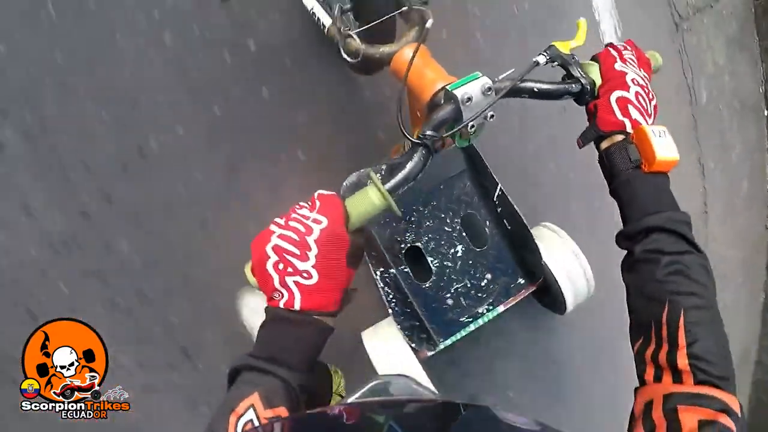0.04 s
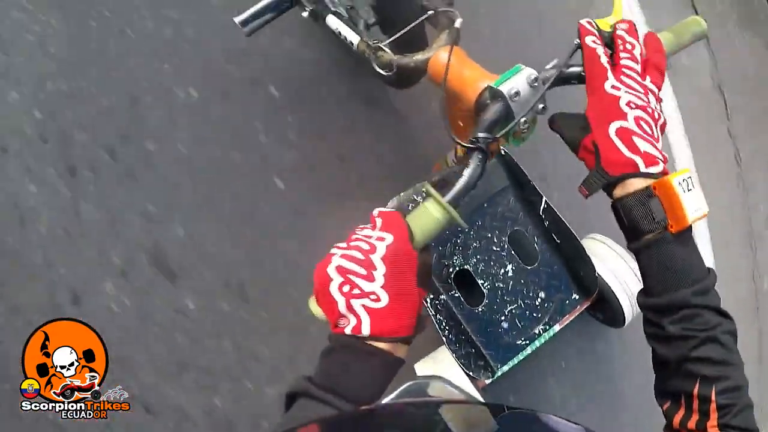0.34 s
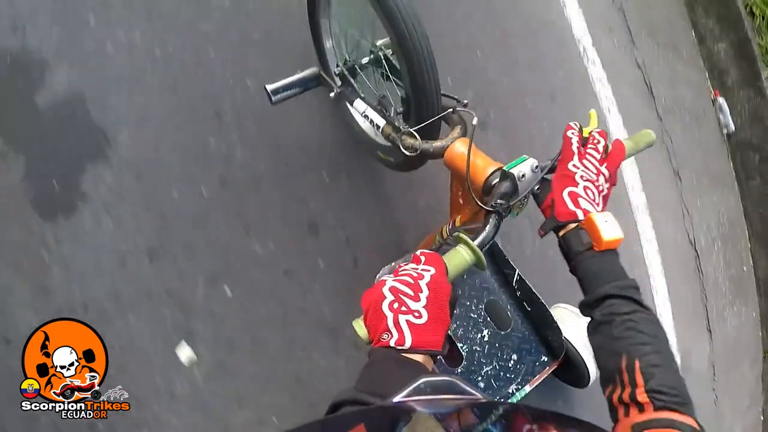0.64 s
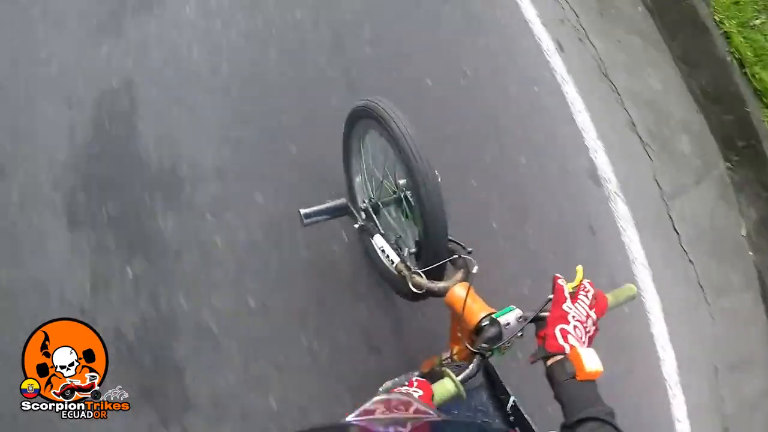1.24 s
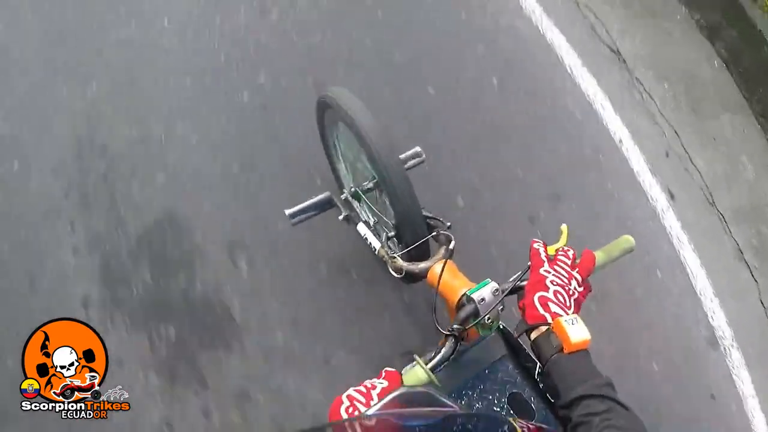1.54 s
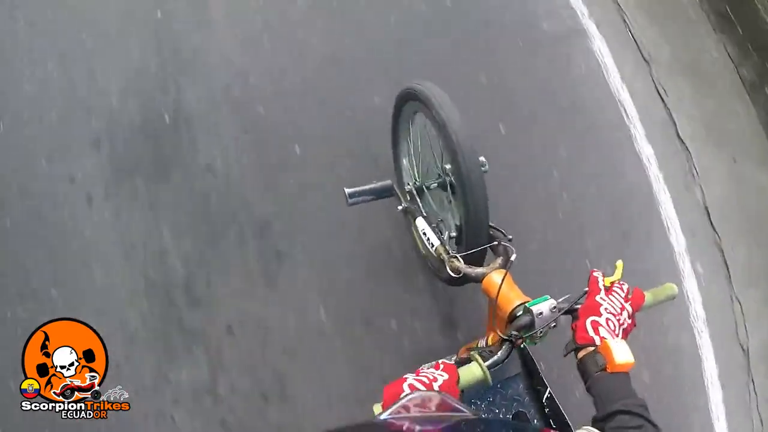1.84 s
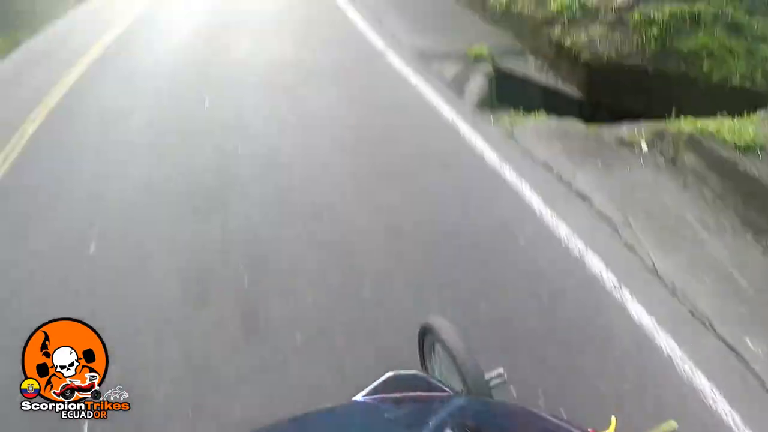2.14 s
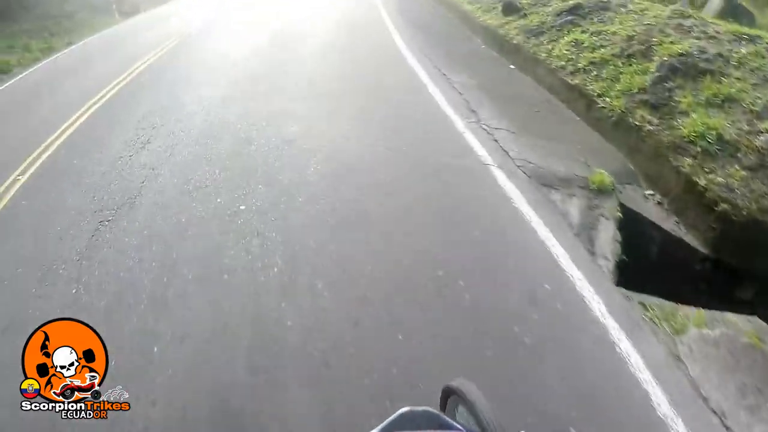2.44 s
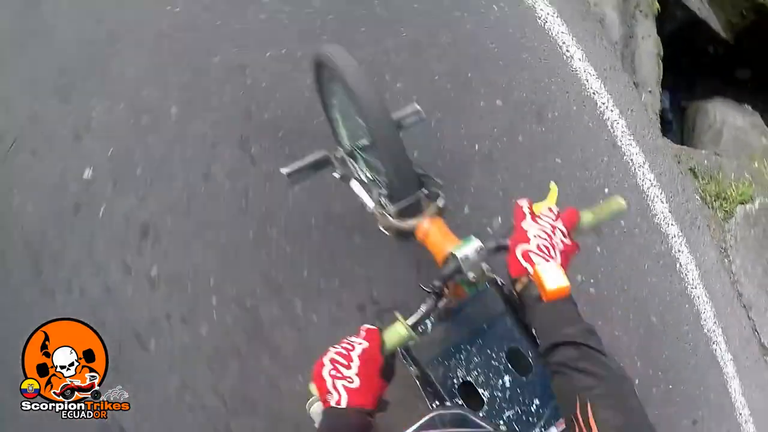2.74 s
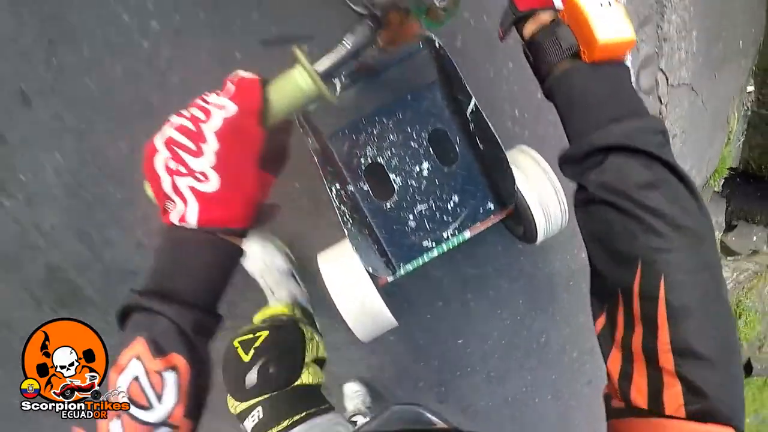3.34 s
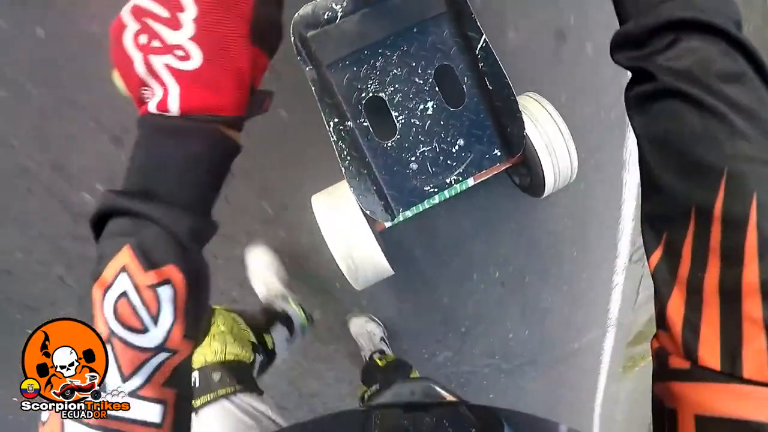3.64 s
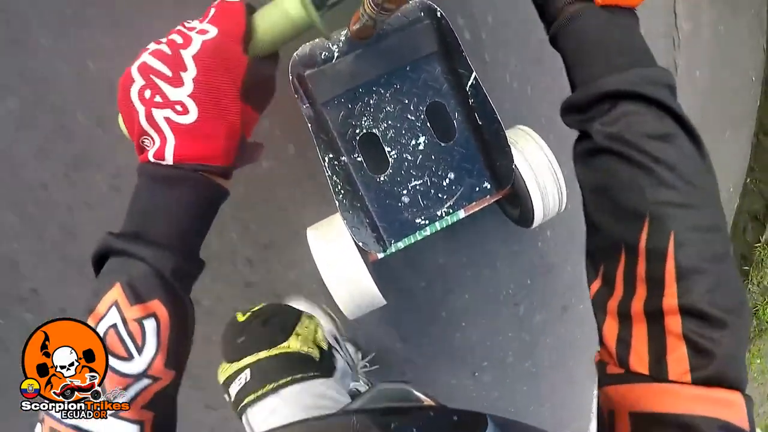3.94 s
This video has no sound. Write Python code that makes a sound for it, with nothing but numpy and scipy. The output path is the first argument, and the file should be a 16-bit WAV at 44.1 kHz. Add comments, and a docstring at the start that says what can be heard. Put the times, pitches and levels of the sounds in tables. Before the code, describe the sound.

A drift trike rolls down a paved road, heard close from the rider's helmet. Its wheels drone and hiss while the chassis ticks and knocks over low wind. A gust hits from the left, then the rolling noise returns.

```python
"""Low wind rumbles over the roar and hiss of hard plastic wheels rolling on gritty asphalt.
A drift trike runs downhill, heard close up from the stereo microphone on the rider's helmet camera.
The trike ticks, bumps knock the frame, air thuds round the helmet and a loose part rattles.
From about 1 s to 3 s the sound widens from mono to stereo and wind buffets the left side;
then it narrows and the wheels come forward again."""
import sys
import numpy as np
from scipy import signal
from scipy.fft import rfft, irfft
from scipy.io import wavfile

SR = 44100
rng = np.random.default_rng(int(sys.argv[2]) if len(sys.argv) > 2 else 0)


def master_out(mix):
    """Clip the mix to full scale and print it as 16-bit PCM to the path in sys.argv[1]."""
    frames = np.transpose(np.atleast_2d(mix))
    ceiling = np.clip(frames, -1, 1)
    pcm = np.round(ceiling * 32767).astype(np.int16)
    wavfile.write(sys.argv[1], SR, pcm)


N = 176400
T, HZ = np.arange(N) / SR, np.fft.rfftfreq(N, 1 / SR)

# Levels are relative: spectra give shape only, and the functions add their own gains.
# low wind in both channels (t/s, level/dB)
RUMBLE_LEVEL = [(0.0, -18.5), (0.13, -28), (0.36, -24.5), (0.47, -32), (0.62, -17.5), (1.09, -27.5),
                (1.34, -23.5), (1.53, -31), (1.62, -24), (1.75, -36), (1.96, -21), (2.28, -26.5),
                (2.34, -40), (2.59, -33), (2.84, -52), (2.99, -29.5), (3.06, -34), (3.28, -31),
                (3.35, -36.5), (3.46, -26.5), (3.72, -25.5), (3.99, -36)]
# hollow drone of wheels and frame (t/s, level/dB)
DRONE_LEVEL = [(0, -37.5), (.12, -27.5), (.5, -30.5), (.66, -29), (1.0, -28), (1.4, -29), (2.4, -40.5),
               (2.8, -49), (2.93, -40), (2.98, -34.5), (3.35, -34), (3.6, -25), (3.7, -30), (3.8, -32.5),
               (4, -32)]
# wheels on the road (t/s, roar/dB, hiss/dB)
ROLL_LEVELS = [(0, -33.5, -44), (.7, -33.5, -44), (1.2, -34, -47), (1.75, -36, -49), (2.15, -37.5, -57.5),
               (2.5, -49, -59), (2.52, -52, -65), (2.75, -46, -60.5), (3.0, -42.5, -51), (3.3, -39, -47.5),
               (3.55, -34.5, -42.5), (3.7, -34.5, -42), (3.78, -37.5, -43.5), (3.95, -32, -40),
               (4, -41, -51)]
# narrow ring within the hiss (t/s, f/Hz, level/dB)
HISS_RING = [(0, 3820, -12), (1.0, 3800, -12), (1.3, 3830, -6.5), (2.0, 3510, 5), (2.2, 3600, -6),
             (2.57, 4350, -16), (2.64, 4300, 0.5), (2.9, 4400, -6), (3.3, 4230, -14), (3.7, 4330, -6)]
# spectra of the low wind and the rolling wheels (f/Hz, level/dB)
RUMBLE_SPECTRUM = [(8, -5), (28, 2), (50, -12), (88, -4), (130, -14), (200, -23.5), (500, -54)]
DRONE_SPECTRUM = [(60, 7), (140, -1.5), (230, 3.5), (400, 2.5), (550, -4), (800, -13), (1500, -54)]
ROAR_SPECTRUM = [(300, -2), (600, -1), (950, -1.5), (1250, -1.5), (1550, -5), (1800, -6.5), (2100, -5),
                 (2400, -6.5), (2650, -13.5), (3200, -17), (5000, -61)]
HISS_SPECTRUM = [(2000, -17), (2600, -43), (3100, -8), (3450, -3.5), (3800, 0.5), (4150, 1.5), (4650, 1),
                 (5350, -5.5), (5850, -5.5), (7000, -13), (8500, -17.5), (10000, -26), (11500, -32),
                 (12500, -27.5), (14500, -39), (15500, -56)]

# sharp ticks of the trike (t/s, level/dB, ring f/Hz, body/dB, top/dB)
TICK_HITS = [(0.0409, -28.5, 4230, -22, -25), (0.081, -24, 5510, -11, -12), (0.1072, -22, 4680, -16, -15),
             (0.1512, -17, 3690, -20, -26), (0.261, -25, 4700, -3.5, -19), (0.372, -28.5, 4000, -9, -14),
             (0.4247, -24, 3670, -15, -24), (0.5043, -28, 3870, 1.5, -13), (0.6218, -20.5, 3840, -8, -12),
             (0.727, -29.5, 3740, -2.5, -19), (0.849, -24.5, 3600, -12, -15), (1.0235, -25, 5540, -7, -21),
             (1.078, -18, 4160, -8, -34), (1.2327, -22.5, 4030, -10, -24), (1.3305, -26, 3850, -0.5, -37),
             (1.4408, -13, 3673, -9, -26), (1.6475, -23.5, 5130, -1, -25), (1.664, -16, 3490, -18, -24),
             (1.881, -18, 3780, -11, -19), (1.9643, -22, 3750, -13, -15), (2.1797, -24, 5980, -13, -5.5),
             (3.158, -30, 4200, -7.5, -32), (3.3497, -18.5, 5790, -10.5, -8),
             (3.5605, -22, 6220, -8.5, -9.5), (3.604, -37, 4600, -23, -5), (3.847, -27, 4500, -19, -14)]
# a tick's crack, body and top (f/Hz, level/dB)
CRACK_SPECTRUM = [(2500, -32), (3100, -8.5), (3700, 7), (4600, 2.5), (5200, 5), (5900, 1), (7400, -8),
                  (9000, -24), (11000, -25)]
BODY_SPECTRUM = [(300, -1), (900, -12.5), (1800, -1.5), (2350, 0), (2800, -17)]
TOP_SPECTRUM = [(3000, -44), (6500, 3), (8200, 1), (9500, -7), (11000, -20), (12700, -7), (14500, -21)]
# frame knocks and wheel scuffs (t/s, level/dB, ring f/Hz, decay/s)
KNOCK_HITS = [(.35, -20.5, 558, 0.02), (.474, -19, 520, 0.016), (.486, -18.5, 890, .009),
              (.625, -14.5, 700, 0.0089), (1.078, -20, 500, 0.0094), (1.281, -11.5, 670, 0.011),
              (1.414, -16, 580, 0.0078), (1.527, -17.5, 615, 0.0061), (3.028, -25, 712, 0.012),
              (3.3, -19, 573, 0.014), (3.589, -33, 440, .014), (3.682, -20.5, 780, 0.028),
              (3.715, -20.5, 612, 0.03), (3.805, -19.5, 493, 0.022), (3.877, -13, 520, 0.0046),
              (3.933, -14.5, 943, 0.0095), (3.957, -19, 823, 0.015)]
# air thudding round the helmet (t/s, length/s, level/dB)
THUD_SWELLS = [(.585, .025, -32), (3.586, 0.027, -21), (3.675, 0.058, -20.5)]
# spectra of knocks and thuds (f/Hz, level/dB)
KNOCK_SPECTRUM = [(150, -36), (400, -9), (650, 5.5), (950, 5.5), (1400, -8), (2200, -8.5), (3000, -20),
                  (6000, -56)]
THUD_SPECTRUM = [(40, -20), (90, 10.5), (200, -1.5), (350, -10.5), (600, -4), (1000, -54)]
# bounces of the loose part (t/s, level/dB)
RATTLE_BOUNCES = [(.657, -24.5), (0.684, -30), (0.697, -31.5), (.705, -39), (0.734, -32), (0.753, -33)]
# its resonances (f/Hz, level/dB, t60/s)
RATTLE_MODES = [(2230, -2.5, 0.035), (2480, -6, 0.022), (2880, -8.5, .02), (3700, -5.5, 0.021)]

# how far the sound opens from mono to stereo; also fades the gust in and out (t/s, share/0-1)
STEREO_SHARE = [(.83, 0), (1.0, 0.99), (2.85, 1), (3.05, 0.51), (3.3, 0.17), (4, 0.04)]
# wind on the left microphone port (t/s, thump/dB, buffet/dB, rush/dB)
GUST_LEVELS = [(1.0, -32, -39, -38.5), (1.06, -29.5, -30.5, -29.5), (1.4, -25, -27, -26),
               (1.72, -19, -25, -20.5), (1.8, -20.5, -23.5, -32), (1.92, -22, -26, -20.5),
               (2.05, -17, -24, -25), (2.11, -24, -29, -25), (2.17, -25, -20.5, -24),
               (2.28, -17.5, -17, -26.5), (2.44, -17.5, -18, -25), (2.54, -23, -17, -30.5),
               (2.7, -25.5, -27, -38.5), (2.78, -37, -45, -41), (2.87, -55, -47, -34.5),
               (2.97, -43, -42, -42)]
# hard eddies slapping it (t/s, length/s, slap/dB, buffet/dB)
EDDY_SLAPS = [(1.56, 0.028, -32, -10), (2.164, 0.031, -17, -30), (2.232, 0.057, -28, -18),
              (2.291, .035, -27, -14), (2.408, 0.012, -32, -14.5), (2.475, 0.034, -15.5, -17),
              (2.5, 0.027, -23, -7), (2.558, 0.028, -26, -14)]
# air fizzing across both ports (t/s, level/dB)
FIZZ_LEVEL = [(1.0, -53.5), (1.7, -52), (2.16, -47), (2.19, -43.5), (2.26, -51), (2.38, -55.5),
              (2.5, -60.5), (2.52, -67), (2.9, -59)]
# spectra of the wind on the microphone (f/Hz, level/dB)
THUMP_SPECTRUM = [(10, -15), (28, -2.5), (60, 0), (105, -0.5), (160, -21.5), (400, -67)]
BUFFET_SPECTRUM = [(50, -13), (110, 4.5), (200, 2.5), (320, -2.5), (480, -8.5), (900, -37)]
RUSH_SPECTRUM = [(150, -14), (350, 2), (520, -3.5), (660, -1.5), (780, -9.5), (950, -8), (1400, -22.5),
                 (2100, -27.5), (3000, -36), (5000, -42.5), (7000, -50)]
SLAP_SPECTRUM = [(250, -14), (450, -4.5), (700, 10.5), (1000, 3), (1400, -11), (2200, -23.5), (3000, -34),
                 (6000, -42.5)]
FIZZ_SPECTRUM = [(2500, -13), (4500, 3), (7300, -1), (8500, -12), (10000, -15.5), (11500, -31.5)]
# gust in the left channel over the right (f/Hz, level/dB)
LEFT_EXCESS = [(40, 36), (150, 23.5), (300, 15), (500, 8.5), (1000, -1), (1700, -4), (3000, -1.5),
               (8000, -2)]
# the left channel's lead (f/Hz, phase/rad)
LEFT_LEAD = [(100, -3), (400, -2.5), (900, -2.5), (1700, -2.5), (3000, -2.3), (8000, -5)]


def amp(db):
    """Decibels to gain."""
    return 10 ** (np.asarray(db) / 20)


def unit(x):
    """Scales to rms 1."""
    return x / np.sqrt(np.mean(x ** 2) + 1e-20)


def curve(rows):
    """Each column of a time table, sample by sample."""
    times, *columns = np.transpose(rows)
    return [np.interp(T, times, column) for column in columns]


def read(points, hz):
    """Reads a spectrum table on a log-frequency axis."""
    f, value = np.transpose(points)
    return np.interp(np.log(hz + 1), np.log(f), value)


def colour(x, points):
    """Filters by a spectrum table, falling steeply past its last point, to rms 1."""
    hz = np.fft.rfftfreq(len(x), 1 / SR)
    rolloff = np.maximum(hz / points[-1][0], 1) ** 3
    return unit(irfft(rfft(x) * amp(read(points, hz)) / rolloff, len(x)))


def noise(points, length=N):
    """Noise with the given spectrum, rms 1."""
    return colour(rng.standard_normal(length), points)


def wander(rate_hz):
    """Random motion from 2 Hz to about the given rate, rms 1."""
    band = (HZ > 2) / np.sqrt(1 + (HZ / rate_hz) ** 4)
    return unit(irfft(rfft(rng.standard_normal(N)) * band, N))


def flutter(rate_hz, depth_db):
    """Randomly wavering gain, rms 1."""
    return unit(amp(depth_db * wander(rate_hz)))


def swells(rows):
    """Gain made of short rounded swells (t/s, length/s, level/dB)."""
    return sum(amp(db) * np.sin(np.pi * np.clip((T - s) / length, 0, 1)) for s, length, db in rows)


def resonate(x, hz, width_hz):
    """A resonance of gain 1 that follows the curve hz."""
    turn = np.exp(2j * np.pi * np.cumsum(hz) / SR)
    pole = np.exp(-np.pi * width_hz / SR)
    return 2 * (turn * signal.lfilter([1 - pole], [1, -pole], x / turn)).real


def add(mix, s, sound):
    """Mixes a sound in at time s."""
    part = mix[..., max(round(s * SR), 0):][..., :sound.shape[-1]]
    part += sound[..., :part.shape[-1]]


def spread(mid, side, width):
    """A pair of channels that opens from mono to stereo with STEREO_SHARE."""
    opening = width * curve(STEREO_SHARE)[0]
    return np.array([mid + opening * side, mid - opening * side]) / np.sqrt(1 + opening ** 2)


def rumble():
    """Lumpy low wind round the helmet, the same in both channels."""
    return amp(curve(RUMBLE_LEVEL)[0]) * noise(RUMBLE_SPECTRUM) * flutter(rate_hz=103, depth_db=2.5)


def stones(per_s, spread_db=4.5):
    """Stones click under the wheels at random, most small and a few large."""
    hits = rng.random(N) < per_s / SR
    sizes = amp(spread_db * np.minimum(rng.exponential(1, N), 4))
    return hits * sizes * rng.choice([-1, 1], N)


def grit(per_s=800, pitches=12, range_hz=(3590, 6420), ring_s=0.00039):
    """Grains crushed under the wheels, each with its own short ping."""
    t = T[:512]
    envelope = t / ring_s * np.exp(-t / ring_s)
    pings = [envelope * np.sin(2 * np.pi * hz * t) / hz for hz in np.geomspace(*range_hz, pitches)]
    return unit(sum(np.convolve(stones(per_s / pitches), ping)[:N] for ping in pings))


def wheels():
    """Rough asphalt shakes the hollow wheels below the rider: drone, roar, ringing hiss and grit."""
    roar_db, hiss_db = curve(ROLL_LEVELS)
    ring_hz, ring_db = curve(HISS_RING)
    ring_hz *= 1 + 0.028 * wander(rate_hz=53)
    bumps = flutter(rate_hz=46, depth_db=1.66)
    crunch = stones(per_s=600)
    drone = amp(curve(DRONE_LEVEL)[0] + 2) * noise(DRONE_SPECTRUM) * flutter(rate_hz=14, depth_db=1.5)
    roar = unit(noise(ROAR_SPECTRUM) + amp(-6.5) * colour(crunch, ROAR_SPECTRUM))
    roar = amp(roar_db - 3) * spread(roar, noise(ROAR_SPECTRUM), width=0.16)
    roar *= flutter(rate_hz=140, depth_db=1.5)
    ring = rng.standard_normal(N) + unit(crunch)
    for _ in range(2):
        ring = resonate(ring, ring_hz, width_hz=290)
    hiss = amp(-2.6) * noise(HISS_SPECTRUM) + amp(-2.5) * grit()
    hiss += amp(ring_db) * unit(ring) * flutter(rate_hz=40, depth_db=2.5)
    hiss = amp(hiss_db) * spread(hiss, noise(HISS_SPECTRUM), width=0.1)
    return bumps * (drone + roar + hiss)


def ticks(rise_s=0.0022, fall_s=0.0032, tail_s=0.032, ring_s=0.0037, clank_ratio=0.487):
    """Chattering contacts on the trike crack, ring and clank, leaving a faint tail."""
    mid_side, t = np.zeros((2, N)), T[:4096]
    rise = np.minimum(t / rise_s, 1)
    age = np.maximum(t - rise_s, 0)
    fall = np.exp(-age / fall_s) + amp(-16.5) * np.exp(-age / tail_s)
    for s, db, ring_hz, body_db, top_db in TICK_HITS:
        tick = np.zeros((2, len(t)))
        for channel in tick:
            crack = noise(CRACK_SPECTRUM, len(t))
            body = amp(body_db + 8.5) * noise(BODY_SPECTRUM, len(t))
            top = amp(top_db + 3.5) * noise(TOP_SPECTRUM, len(t))
            channel += amp(-10) * fall * (crack + body + top)
        ring_db = -5.5 + 0.75 * (db + 18)  # harder ticks ring more
        ring = amp(ring_db) * np.sin(2 * np.pi * ring_hz * t)
        clank = amp(body_db - 5) * np.sin(2 * np.pi * clank_ratio * ring_hz * t)
        tick[0] += (ring + clank) * np.exp(-age / ring_s)  # the tones sit in the centre
        add(mid_side, s, amp(db) * rise * tick)
    return spread(*mid_side, width=0.53)


def knocks(rise_s=0.0026):
    """Bumps in the road jolt the frame and scuff the wheels."""
    out, t = np.zeros(N), T[:4096]
    for s, db, ring_hz, fall_s in KNOCK_HITS:
        envelope = np.minimum(t / rise_s, 1) * np.exp(-t / fall_s)
        scuff = amp(-9) * noise(KNOCK_SPECTRUM, len(t))
        ring = amp(-10.5) * np.sin(2 * np.pi * ring_hz * t)
        add(out, s, amp(db) * envelope * (scuff + ring))
    return out


def thuds():
    """Short low pushes of air, right on the microphone."""
    return swells(THUD_SWELLS) * noise(THUD_SPECTRUM)


def rattle():
    """After a hard bump a loose part bounces, ringing a little differently each time."""
    out, t = np.zeros(N), T[:2048]
    for s, db in RATTLE_BOUNCES:
        for hz, mode_db, t60 in RATTLE_MODES:
            tone = np.sin(2 * np.pi * hz * rng.uniform(0.97, 1.03) * t)
            add(out, s, amp(db + mode_db - 60 * t / t60) * tone)
    return out


def gust():
    """Eddies hit the left port; the right channel carries a thinner, nearly inverted copy."""
    thump_db, buffet_db, rush_db = curve(GUST_LEVELS)
    eddies = flutter(rate_hz=28, depth_db=3.0)
    thump = amp(thump_db + 5.5) * noise(THUMP_SPECTRUM)
    buffet = amp(buffet_db + 5) * noise(BUFFET_SPECTRUM)
    rush = amp(rush_db + 4.5) * noise(RUSH_SPECTRUM) * eddies
    starts, lengths, slap_db, slap_buffet_db = np.transpose(EDDY_SLAPS)
    slaps = noise(SLAP_SPECTRUM) * swells(zip(starts, lengths, slap_db))
    slaps += noise(BUFFET_SPECTRUM) * swells(zip(starts, lengths, slap_buffet_db))
    left = thump + buffet + rush + slaps
    left_to_right = amp(-read(LEFT_EXCESS, HZ)) * np.exp(-1j * read(LEFT_LEAD, HZ))
    right = irfft(rfft(left) * left_to_right, N)
    fizz = np.array([noise(FIZZ_SPECTRUM), noise(FIZZ_SPECTRUM)])
    fizz *= amp(curve(FIZZ_LEVEL)[0]) * flutter(rate_hz=70, depth_db=3.9)
    return (np.array([left, right]) + fizz) * curve(STEREO_SHARE)[0]


def scene():
    """Wind on the microphone and the trike just below it."""
    return gust() + rumble() + wheels() + ticks() + knocks() + rattle() + thuds()


def record(dry, cutoff_hz=15400):
    """The helmet camera overloads softly near full scale, then cuts the highest treble."""
    limited = dry / (1 + dry ** 8) ** (1 / 8)
    lowpass = signal.firwin(511, cutoff_hz, window=("kaiser", 9), fs=SR)
    return signal.oaconvolve(limited, lowpass[None], "same")


dry = scene()
out = record(dry)
master_out(out)
```